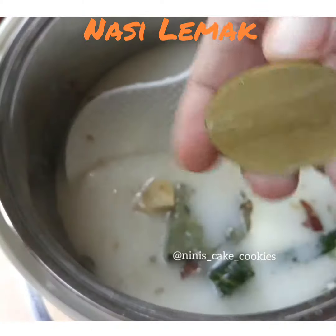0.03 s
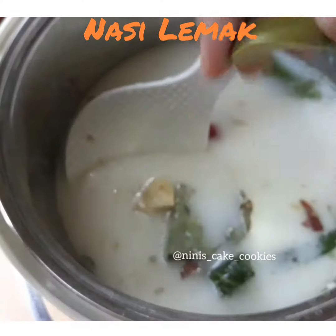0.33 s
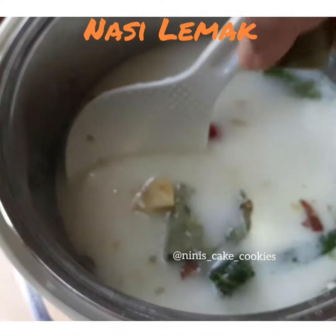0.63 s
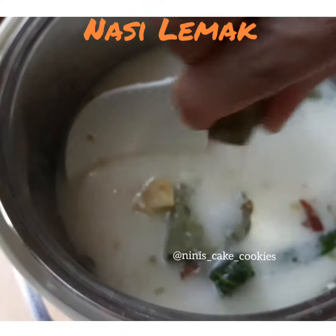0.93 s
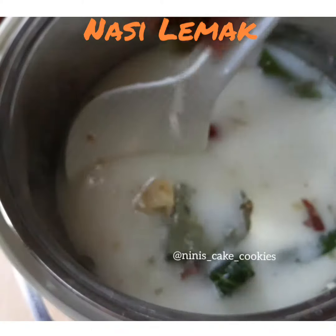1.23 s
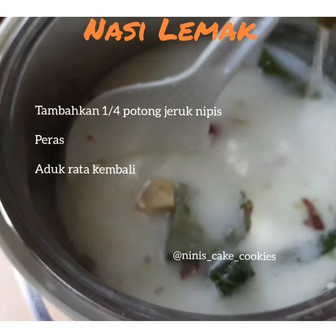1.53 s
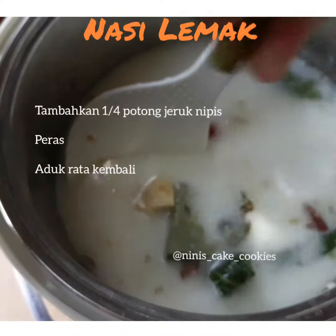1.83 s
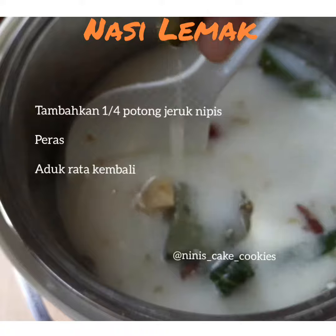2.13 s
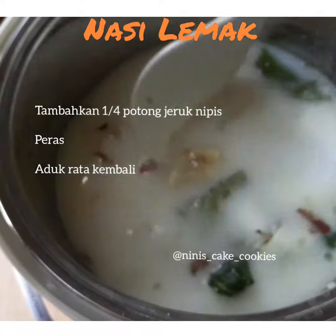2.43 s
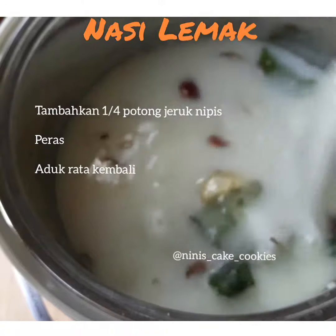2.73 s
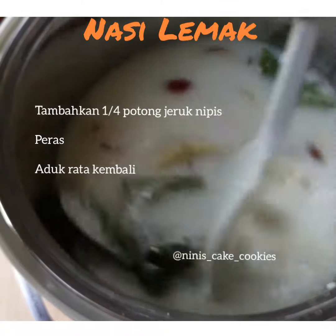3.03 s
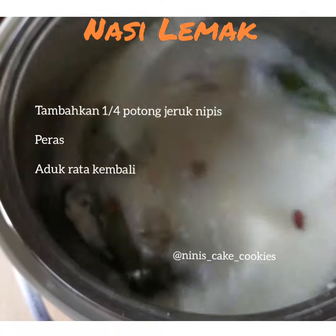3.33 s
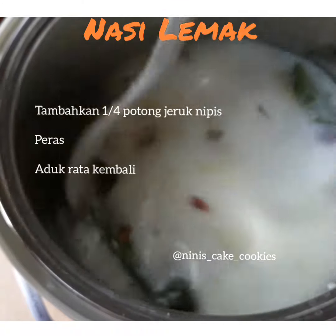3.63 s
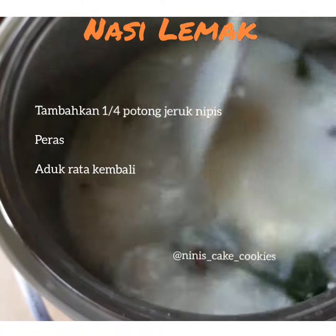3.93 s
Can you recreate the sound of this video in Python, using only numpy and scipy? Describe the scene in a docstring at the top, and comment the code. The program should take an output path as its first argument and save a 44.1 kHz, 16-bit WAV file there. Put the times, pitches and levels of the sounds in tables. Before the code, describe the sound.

A lime is squeezed over a pot of liquid, with faint rubs, a snap, a squirt and small drips. A plastic paddle then stirs softly, knocks the pot once and makes a loud plop, close by in a quiet, humming kitchen.

```python
"""Lime squeezed into coconut milk

In a quiet, humming kitchen, a lime wedge rubs, snaps and squelches over a rice cooker pot of coconut
milk. Juice squirts in and a few drops plink as trapped air resonates. A plastic paddle stirs softly
amid faint ticks, knocks the pot once, exciting its modes, and traps one loud bubble."""
import sys
import numpy as np
from scipy import signal
from scipy.fft import rfft, irfft
from scipy.io import wavfile

SR = 44100
rng = np.random.default_rng(int(sys.argv[2]) if len(sys.argv) > 2 else 0)


def dump(signal):
    """Clip the signal to [-1, 1] and save it as 16-bit WAV at the path in sys.argv[1]."""
    limited = np.clip(np.atleast_2d(signal).T, -1, 1)
    pcm = np.round(limited * 32767).astype(np.int16)
    wavfile.write(sys.argv[1], SR, pcm)


N = 176400
TIME = np.arange(N) / SR


def amp(db):
    """Amplitude ratio of a level in decibels."""
    return 10 ** (np.asarray(db) / 20)


def unit(x):
    """Normalisation to rms 1."""
    return x / np.sqrt(np.mean(x ** 2) + 1e-20)


def add(mix, start, sound):
    """Superposition of a sound on the mix, from a start in seconds."""
    part = mix[max(round(start * SR), 0):][:len(sound)]
    part += sound[:len(part)]


def colour(x, points):
    """Spectral shaping by (f/Hz, level/dB) points, at rms 1."""
    hz, db = np.transpose(points)
    f = np.fft.rfftfreq(len(x), 1 / SR)
    gain = amp(np.interp(np.log(f + 1), np.log(hz), db))
    return unit(irfft(rfft(x) * gain, len(x)))


def band(x, lo, hi, order=6):
    """Band-pass filtering, at rms 1."""
    f = np.fft.rfftfreq(len(x), 1 / SR) + 1
    return unit(irfft(rfft(x) / (1 + (lo / f) ** order) / (1 + (f / hi) ** (2 * order)), len(x)))


def grains(per_s, spread_db):
    """Shot noise: independent clicks at random times."""
    size = amp(spread_db * np.minimum(rng.exponential(1, N), 4))
    return size * rng.choice([-1, 1], N) * (rng.random(N) < per_s / SR)


def burst(bands, rise_s, lowest_hz, size=16384):
    """Dense modes of an impact merge into noise, each band with its own damping."""
    t, out, lo = np.arange(size) / SR, 0, lowest_hz
    for hi, db, t60 in bands:
        flattened = np.sign(band(rng.standard_normal(size), lo, hi))
        out += band(flattened, lo, hi) * amp(db - 60 * t / t60)
        lo = hi
    return out * (1 - np.exp(-t / rise_s))


def impacts(events, bands, rise_s, lowest_hz):
    """Repeated impulsive excitation: one burst at each (t/s, gain/dB)."""
    out = np.zeros(N)
    for start, db in events:
        add(out, start, amp(db) * burst(bands, rise_s, lowest_hz))
    return out


# Spectrum of the room noise: f/Hz, relative level/dB
AIR_SPECTRUM = [(15, -64), (25, -17), (64, -8.5), (92, -7), (123, -1), (149, -5), (180, 4.5), (206, -7),
                (335, -7.5), (363, -10), (863, -26), (988, -33), (2220, -32.5), (2480, -36), (3520, -29.5),
                (4870, -27), (6380, -35.5), (9070, -37.5), (16000, -40)]
# Tones of the appliance: f/Hz, level/dB
HUM_TONES = [(119, -66), (179, -61.5), (300.5, -67)]
def kitchen(air_db=-53.5, waver=0.41, waver_hz=7):
    """Steady room noise, and an appliance hum wavering by amplitude and phase modulation."""
    out = amp(air_db) * colour(rng.standard_normal(N), AIR_SPECTRUM)
    for hz, db in HUM_TONES:
        sway, drift = (waver * band(rng.standard_normal(N), 0.68, waver_hz) for _ in range(2))
        out += amp(db) * np.sqrt(2) * (1 + sway) * np.sin(2 * np.pi * hz * TIME + drift)
    return out


# Air modes of the pot: f/Hz, bandwidth/Hz, gain/dB
AIR_MODES = [(432, 150, 11.5), (790, 26, 4), (1183, 106, 8), (1536, 80, 5), (1990, 70, 0.5), (2620, 150, 2)]
def in_pot(x):
    """Cavity resonance: the air in the pot lifts frequencies near its modes."""
    f = np.fft.rfftfreq(len(x), 1 / SR)
    lift_db = sum(db / (1 + (2 * (f - hz) / width) ** 2) for hz, width, db in AIR_MODES)
    return irfft(rfft(x) * amp(lift_db), len(x))


# Edges of the five bands of a stroke: f/Hz
STROKE_EDGES = [330, 900, 2700, 5700, 10000, 15000]
def strokes(events, per_s, spread_db):
    """Shot noise, coloured by the pot, swells, holds and decays exponentially."""
    clicks, out = in_pot(grains(per_s, spread_db)), np.zeros(N)
    bands = np.array([band(clicks, lo, hi) for lo, hi in zip(STROKE_EDGES, STROKE_EDGES[1:])])
    for start, rise, hold, t60, *levels in events:
        t = TIME - start
        envelope = np.clip(t / rise, 0, 1) * amp(-60 * np.maximum(t - rise - hold, 0) / t60)
        out += envelope * (amp(levels) @ bands)
    return out


# Rubs on the peel: t/s, rise/s, hold/s, T60/s, then level/dB in each stroke band
PEEL_RUBS = [(-0.03, 0.07, 0.1, 0.26, -61, -63.5, -59, -69.5, -69.5),
             (0.165, 0.029, 0.053, 0.14, -60.5, -61.5, -55, -75, -69),
             (0.228, 0.004, 0.014, 0.49, -54.5, -49.5, -52.5, -54, -61),
             (0.361, 0.0015, 0.044, 0.43, -52, -50, -43, -62.5, -64),
             (0.48, 0.079, 0.017, 0.29, -60, -61.5, -65, -90, -78),
             (0.80, 0.013, 0.061, 0.5, -59.5, -112, -93, -85, -78),
             (0.935, 0.015, 0.062, 0.24, -51, -64.5, -55.5, -67, -68),
             (1.042, 0.0078, 0.024, 1, -55.5, -65.5, -55.5, -65.5, -66.5),
             (2.305, 0.011, 0.0074, 0.038, -62, -76, -88, -63.5, -81)]
def rubbing():
    """Friction of fingers on wet peel gives a dense stream of tiny clicks."""
    return strokes(PEEL_RUBS, per_s=9000, spread_db=0)


# Squelches of pulp and liquid: t/s, length/s, starting f/Hz, glide/(octaves/s), width/Hz, level/dB
WET_SQUELCHES = [(0.037, 0.14, 1260, 1, 252, -56.5), (0.079, 0.082, 7900, 0, 2200, -57),
                 (0.566, 0.053, 4150, 1, 710, -52.5), (0.794, 0.52, 5600, 0.5, 700, -68.5),
                 (.82, .1, 482, -1.5, 70, -53), (.945, 0.11, 485, -1.5, 110, -49.5),
                 (.82, 0.12, 470, 0.5, 68.5, -55), (.945, 0.055, 490, 8, 110, -52),
                 (1.35, 0.1, 5400, 1, 402, -52.5), (1.653, 0.22, 1250, 0.5, 162, -63.5),
                 (1.665, 0.19, 3900, 1, 920, -58.5), (1.816, 0.032, 10870, 0, 900, -48),
                 (1.962, 0.38, 3800, 1.4, 910, -64.5), (2.07, .16, 2570, -0.5, 298, -65),
                 (2.15, 0.093, 9000, 0.5, 1600, -63), (2.662, 0.6, 4300, 1.3, 1200, -67),
                 (2.803, 0.17, 1510, -1, 336, -62.5), (3.08, 0.21, 1330, -1, 200, -64),
                 (3.118, 0.041, 4700, 2, 1000, -64), (3.487, 0.032, 4560, -5.5, 926, -42.5),
                 (3.71, 0.12, 1380, -1.5, 140.4, -63.5), (3.903, .07, 2060, 0.5, 159, -64)]
def squelches(peak_at=0.21, size=32768):
    """Liquid forced through a small gap excites a resonance that glides as the gap changes."""
    out, t, f = np.zeros(N), np.arange(size) / SR, np.fft.fftfreq(size, 1 / SR)
    for start, length, hz, glide, width, db in WET_SQUELCHES:
        carrier = np.exp(2j * np.pi * np.cumsum(hz * 2 ** (glide * t)) / SR)
        clicks = grains(per_s=7000, spread_db=2.5)[:size]
        # Shift down, low-pass, shift back: a passband that follows the glide.
        ring = carrier * np.fft.ifft(np.fft.fft(clicks / carrier) / (1 + (f / width) ** 2) ** 2)
        age = t / (peak_at * length)
        add(out, start, amp(db) * age * np.exp(1 - age) * unit(ring.real))
    return out


# Snaps of the peel: t/s, gain/dB
PEEL_SNAPS = [(.3655, 6.5), (.3755, 5.5), (.383, 6.5), (.392, 3)]
# Bands of one snap: upper f/Hz, level/dB, T60/s
SNAP_BANDS = [(1080, -68, 0.029), (2480, -41, 0.015), (5650, -30, 0.0078), (9700, -48.5, 0.026)]
def snaps():
    """Snapping peel radiates brief broadband transients."""
    return impacts(PEEL_SNAPS, SNAP_BANDS, rise_s=0.00016, lowest_hz=400)


# Air trapped by drops and the paddle: t/s, final f/Hz, peak level/dB, swell/s
AIR_BUBBLES = [(0.967, 470, -37, 0.0032), (1.217, 434, -34.5, 0.0062), (1.292, 448, -30.5, 0.003),
               (1.4504, 3960, -32, 0.0019), (1.4545, 3660, -37.5, 0.0019), (1.4806, 7380, -31, 0.0014),
               (1.5618, 2360, -39, 0.0033), (1.6577, 3580, -41.5, 0.0034), (3.5433, 2029, -8.5, 0.0034),
               (3.554, 4080, -28.5, 0.0016)]
def bubbles(shape=1.6, sag=0.27, settle_s=0.0007):
    """Each bubble is a damped oscillator that swells and dies while its pitch slides up to rest."""
    out, t = np.zeros(N), np.arange(SR // 10) / SR
    for start, hz, db, swell in AIR_BUBBLES:
        cycles = np.cumsum(hz * (1 - sag * np.exp(-t / settle_s))) / SR
        envelope = (t / swell * np.exp(1 - t / swell)) ** shape
        add(out, start, amp(db) * envelope * np.sin(2 * np.pi * cycles))
    return out


# Narrow modes of the pot wall: f/Hz, T60/s, gain/dB
WALL_MODES = [(2100, 0.39, -13), (2320, .3, -8.5)]
def wall_ring(x):
    """Sympathetic resonance: the wall, driven through the liquid, rings on at its own frequencies."""
    out = np.zeros(N)
    for hz, t60, db in WALL_MODES:
        quality = hz * t60 * np.pi / np.log(1000)
        out += amp(db) * signal.lfilter(*signal.iirpeak(hz, quality, fs=SR), x)
    return out


# Squirts of juice: t/s, rise/s, hold/s, T60/s, then level/dB in each stroke band
JUICE_SQUIRTS = [(1.178, 0.0083, 0.046, 0.43, -44, -41.5, -42, -55, -57),
                 (1.235, 0.036, 0.023, 0.26, -46.5, -64, -62, -64, -54),
                 (1.345, 0.018, 0.024, 1, -63, -65.5, -59.5, -69, -73),
                 (1.73, 0.084, 0.0092, 0.27, -65, -71, -62.5, -63, -61.5),
                 (1.828, 0.0089, 0.02, 0.5, -52, -67, -57.5, -70, -64)]
def squirts():
    """The many small impacts of spray landing in the pot sum to a hiss."""
    return strokes(JUICE_SQUIRTS, per_s=7000, spread_db=1)


# Drops landing: t/s, gain/dB
JUICE_DROPS = [(1.4502, -0.5), (1.562, -0.5), (1.657, -4.5)]
# Bands of a drop's tick: upper f/Hz, level/dB, T60/s
DROP_BANDS = [(3030, -48.5, 0.007), (5260, -37.5, 0.011), (13800, -47.5, .011)]
def drops():
    """Impact on the surface gives each drop a sharp tick, the sum of two independent bursts."""
    return sum(impacts(JUICE_DROPS, DROP_BANDS, rise_s=0.0001, lowest_hz=hz) for hz in (1520, 1480))


# Tiny wet slaps: t/s, centre f/Hz, level/dB
WET_SPLATS = [(1.4794, 8600, -37), (1.4808, 9000, -37.5), (2.312, 3400, -56.5), (2.317, 4530, -54.5),
              (2.972, 8200, -49.5), (3.064, 8150, -42), (3.068, 8300, -43.5), (3.066, 13100, -51),
              (3.21, 11400, -60), (3.2225, 5300, -51), (3.223, 9600, -48.5), (3.353, 4000, -47.5),
              (3.5431, 1530, -31), (3.5432, 3380, -28), (3.5422, 7900, -38.5), (3.5527, 7000, -39),
              (3.567, 4400, -40.5)]
def splats(rise_s=0.0003, t60=0.03, span=1.24, size=4096):
    """Liquid landing or a film breaking radiates a short pulse of band-limited noise."""
    out, t = np.zeros(N), np.arange(size) / SR
    for start, hz, db in WET_SPLATS:
        noise = band(rng.standard_normal(size), hz / span, hz * span, order=8)
        add(out, start, noise * amp(db - 60 * t / t60) * (1 - np.exp(-t / rise_s)))
    return out


# Course of the stirring: t/s, then level/dB of slosh, scrape, swish and fizz
STIR_LEVELS = [(2.5, -85, -72, -82, -68), (2.62, -63, -75, -65, -74.5), (2.78, -74, -75, -66.5, -62),
               (2.95, -77, -63, -62.5, -67), (3.03, -80, -75, -67.5, -69.5), (3.12, -59, -62, -58.5, -62.5),
               (3.21, -61.5, -72, -63.5, -65), (3.3, -55.5, -76, -71, -74),
               (3.38, -50.5, -60.5, -66.5, -78.5), (3.482, -50.5, -56, -48.5, -57.5),
               (3.599, -53.5, -61, -56.5, -58.5), (3.72, -60, -64.5, -63, -79),
               (3.821, -56, -63, -63.5, -69), (3.89, -60.5, -58, -57, -61), (4.0, -59, -64.5, -65, -77)]
# Spectra of the low slosh, hollow scrape, wet swish and bursting froth: f/Hz, relative level/dB
SLOSH_SPECTRUM = [(40, -48), (100, -18.5), (280, -7.5), (470, -2), (700, -17), (1100, -34), (3000, -58)]
SCRAPE_SPECTRUM = [(500, -9.5), (850, 0.5), (1050, -15), (1300, 0), (1600, -11), (2100, -4), (2600, -18),
                   (3500, -19.5)]
SWISH_SPECTRUM = [(1800, -19), (3000, -8.5), (4200, 2.5), (5200, -3), (6300, -9), (12000, -21)]
FIZZ_SPECTRUM = [(3000, -22), (6200, -9), (8500, 6.5), (10500, -11), (16000, -1.5)]
def stirring(churn_db=2, churn_hz=25):
    """The paddle moves liquid and rice in uneven surges: shot noise under amplitude modulation."""
    times, *levels = np.transpose(STIR_LEVELS)
    swish = colour(grains(per_s=1100, spread_db=3), SWISH_SPECTRUM)
    slosh = colour(band(grains(per_s=770, spread_db=1), 130, 3000), SLOSH_SPECTRUM)
    scrape = colour(grains(per_s=2300, spread_db=0), SCRAPE_SPECTRUM)
    fizz = colour(grains(per_s=900, spread_db=3), FIZZ_SPECTRUM)
    churn = churn_db * band(rng.standard_normal(N), 2, churn_hz)
    return sum(layer * amp(np.interp(TIME, times, db, left=-120) + churn)
               for layer, db in zip([slosh, scrape, swish, fizz], levels))


# Runs of faint ticks: start t/s, end t/s, nominal gain/dB
TICK_TRAINS = [(2.584, 2.69, -48), (2.742, 2.84, -54), (2.905, 2.92, -56), (3.608, 3.755, -52),
               (3.844, 3.955, -54)]
# Bands of one tick: upper f/Hz, level/dB, T60/s
TICK_BANDS = [(10600, -3, .003), (16000, 3.5, 0.0074)]
def ticks(period_s=0.02):
    """Periodic pulse trains of uneven strength are heard as short runs of thin ticks."""
    out = np.zeros(N)
    for start, end, db in TICK_TRAINS:
        for beat in np.arange(start, end, period_s):
            gain = amp(db + rng.uniform(-12, 4))
            add(out, beat, gain * burst(TICK_BANDS, rise_s=0.0001, lowest_hz=5500, size=512))
    return out


# Bands of the paddle's blow: upper f/Hz, level/dB, T60/s
KNOCK_BANDS = [(334, -41, .11), (780, -33.5, 0.09), (2700, -30.5, 0.18), (5800, -17, 0.055),
               (10100, -17, 0.039), (15600, -25.5, 0.028)]
# Modes of the struck pot: f/Hz, level/dB, T60/s
POT_MODES = [(160, -39.5, 0.56), (418, -45, 0.35), (685, -41.5, 0.12), (1070, -36.5, 0.2),
             (1490, -30.5, 0.067), (1660, -44, 0.14), (2054, -36.5, 0.36), (2220, -42.5, .11),
             (3255, -28, 0.078), (3630, -19, 0.059), (4330, -22, 0.071), (5340, -20.5, 0.054),
             (9050, -33, 0.077)]
def knock(start=3.388, thud_hz=598, thud_db=-15, swell_s=0.00086):
    """The paddle's impact excites modes that the liquid damps; the base gives way once with a thud."""
    out, t = np.zeros(N), np.arange(SR // 2) / SR
    crack = burst(KNOCK_BANDS, rise_s=0.0015, lowest_hz=130)
    thud = amp(thud_db) * t / swell_s * np.exp(1 - t / swell_s) * np.sin(2 * np.pi * thud_hz * t)
    ring = sum(amp(db - 60 * t / t60) * np.sin(2 * np.pi * hz * t) * rng.choice([-1, 1])
               for hz, db, t60 in POT_MODES)
    for part in (crack, thud, ring):
        add(out, start, part)
    return out * np.clip((TIME - start) / 0.00064, 0, 1)


# Reverberation time of the kitchen: f/Hz, T60/s
ROOM_DECAY = [(200, 1), (700, 0.47), (2000, 0.44), (4500, 0.38), (9000, 0.37), (16000, 0.18)]
def room(x, build_s=0.0028):
    """Reverberation: convolution with a diffuse tail, each band decaying at its own rate."""
    hz, t, spectra = signal.stft(rng.standard_normal(SR), SR, nperseg=256)
    t60 = np.interp(hz, *np.transpose(ROOM_DECAY))[:, None]
    tail = signal.istft(spectra * amp(-60 * t / t60) * np.minimum(t / build_s, 1), SR)[1]
    return signal.fftconvolve(x, tail / np.linalg.norm(tail))[:N]


# Spectrum of the hiss that differs between the ears: f/Hz, relative level/dB
SIDE_SPECTRUM = [(40, -1), (2400, -13.5), (5000, -4.5), (16000, -6)]
def stereo_side(sharp, hiss_db=-80.5, treble_db=-7, above_hz=8500):
    """Interaural difference: faint hiss, and the top treble of sharp sounds shifted a quarter cycle."""
    f = np.fft.rfftfreq(N, 1 / SR) + 1
    hiss = colour(rng.standard_normal(N), SIDE_SPECTRUM)
    treble = irfft(1j * rfft(sharp) / (1 + (above_hz / f) ** 10), N)
    return amp(hiss_db) * hiss + amp(treble_db) * treble


def scene():
    """Superposition of all sources in the middle, widened by a side signal of opposite sign in each ear."""
    lime = rubbing() + squirts() + snaps() + squelches()
    plinks = bubbles() + splats() + drops()
    blow, stir, ticking = knock(), stirring(), ticks()
    reverb = room(amp(-11.5) * (lime + stir) + amp(-20.5) * plinks + amp(-16.5) * blow)
    mid = kitchen() + lime + plinks + wall_ring(plinks) + stir + ticking + blow + reverb
    side = stereo_side(plinks + blow + ticking)
    return np.array([mid + side, mid - side])


def record(dry):
    """Band limiting: a steep low-pass at 16.2 kHz."""
    lowpass = signal.firwin(511, 16200, window=("kaiser", 9), fs=SR)
    return signal.oaconvolve(dry, lowpass[None], "same")


dry = scene()
out = record(dry)
dump(out)
```